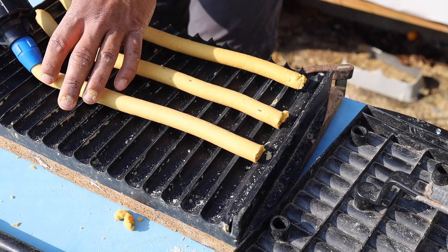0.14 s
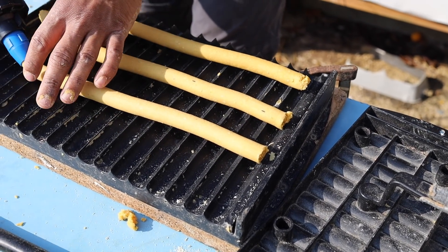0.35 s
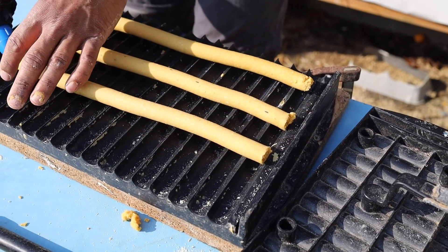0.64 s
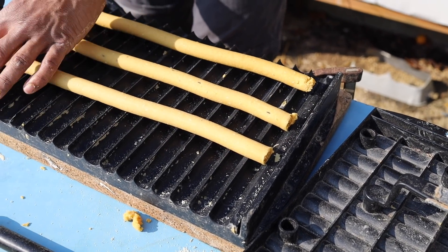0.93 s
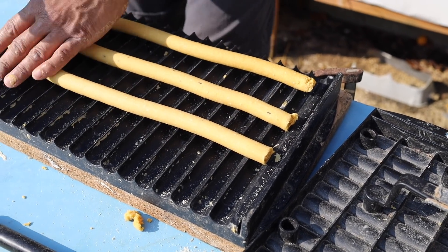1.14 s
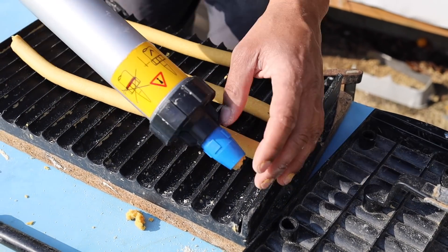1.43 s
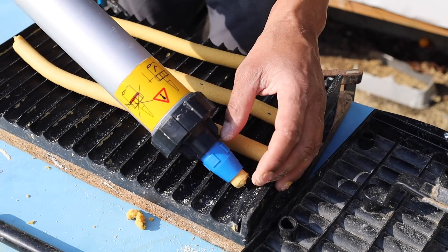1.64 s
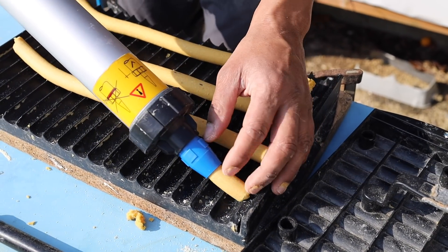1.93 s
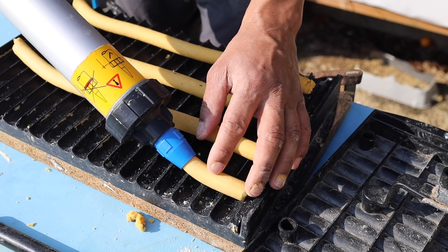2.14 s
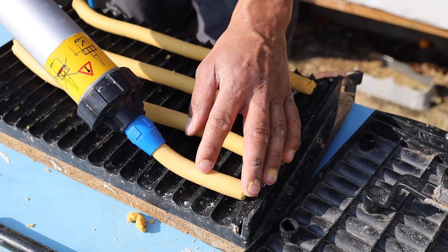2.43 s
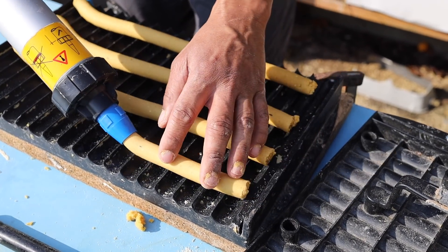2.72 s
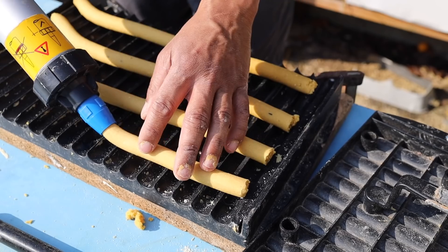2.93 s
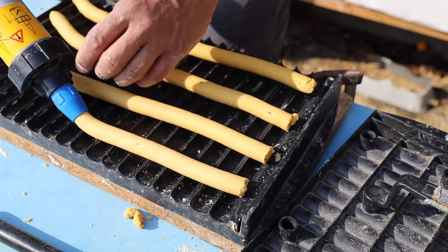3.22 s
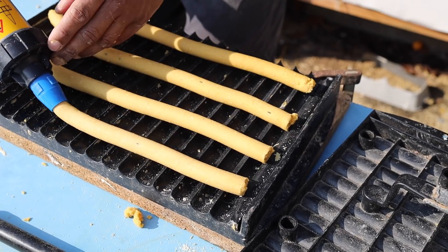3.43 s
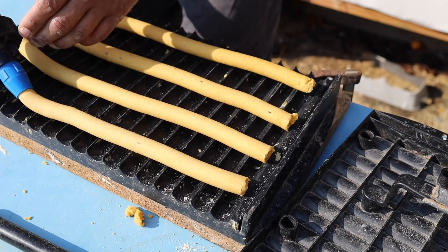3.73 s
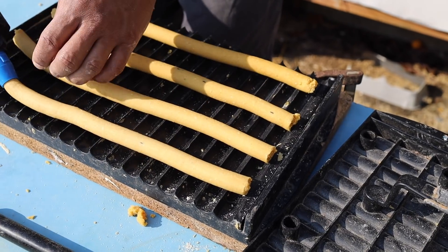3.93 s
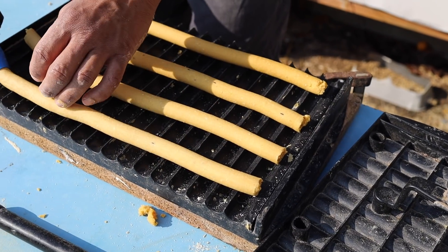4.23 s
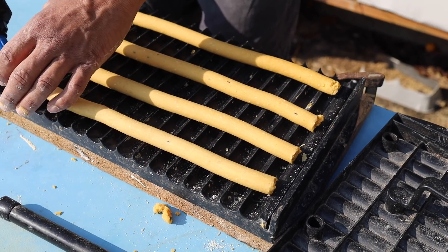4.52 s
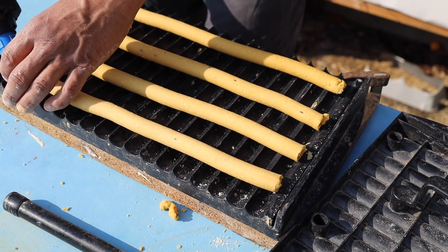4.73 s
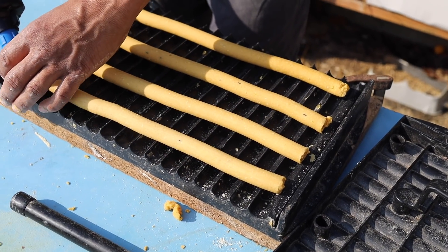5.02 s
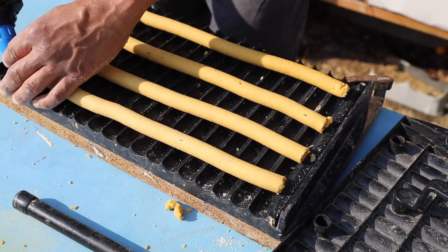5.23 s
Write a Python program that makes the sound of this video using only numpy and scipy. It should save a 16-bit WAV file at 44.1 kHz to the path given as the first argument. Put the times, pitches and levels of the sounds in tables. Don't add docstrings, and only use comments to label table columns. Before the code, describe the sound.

In a quiet open yard, a hand-held air gun dumps pressure in three brief, bright, clipping bursts: one early, two late. Following the first, airy hiss swells and fades as the nozzle bumps the tray. Mid-way, a hard rattling clack and a softer ringing knock stand out. Tiny plastic ticks and creaks fill the gaps. Very close stereo microphone, hardly any echo, low distant background.

```python
import sys
import numpy as np
from scipy import signal
from scipy.fft import rfft, irfft
from scipy.io import wavfile
from scipy.ndimage import uniform_filter1d

SR = 44100
rng = np.random.default_rng(int(sys.argv[2]) if len(sys.argv) > 2 else 0)


def file_out(sig):
    cols = np.atleast_2d(sig).T
    lim = np.clip(cols, -1, 1)
    pcm = np.round(lim * 32767).astype(np.int16)
    wavfile.write(sys.argv[1], SR, pcm)


def field_ratio(decibels):
    return 10 ** (np.asarray(decibels, dtype=float) / 20)


N = 236640


def evened(x):
    return x / np.sqrt(np.mean(x ** 2) + 1e-20)


def read(points, hz):
    f, value = np.transpose(points)
    return np.interp(np.log(hz + 1), np.log(f + 1), value)


def add(mix, start_s, sound):
    part = mix[..., round(start_s * SR):][..., :sound.shape[-1]]
    part += sound[..., :part.shape[-1]]


def resonate(x, hz, width_hz):
    turn = np.exp(2j * np.pi * np.cumsum(hz * np.ones(x.shape[-1])) / SR)
    pole = np.exp(-np.pi * width_hz / SR)
    return 2 * (turn * signal.lfilter([1 - pole], [1, -pole], x / turn)).real


def humps(modes, hz):
    return sum(field_ratio(db) ** 2 / (1 + (2 * (hz - f) / width_hz) ** 2) for f, width_hz, db in modes)


def air(count, colour_db, same, lag, pan_db, patchy_db, flicker_db, held_frames=90):
    frames, hz = count // 64 + 5, np.fft.rfftfreq(256, 1 / SR)[:, None]
    a, b, c, d, patches = rng.standard_normal((frames, 129, 5)).T
    patches = uniform_filter1d(patches, size=2, axis=0)
    patches = evened(uniform_filter1d(patches, size=held_frames, axis=1))
    flicker = evened(uniform_filter1d(rng.standard_normal(frames), size=5))

    gain = field_ratio(colour_db(hz, np.arange(frames) * 64 / SR) + 0 * patches)
    gain = gain / np.sqrt((gain ** 2).mean(0))
    gain = gain * field_ratio(patchy_db * patches + flicker_db * flicker)

    like = np.clip(read(same, hz), 0, 1)
    near = a + 1j * b
    late = np.exp(-2j * np.pi * hz * lag / SR)
    far = like * near * late + np.sqrt(1 - like ** 2) * (c + 1j * d)
    z = np.array([near * field_ratio(pan_db), far]) * gain
    return evened(signal.istft(z, nperseg=256, noverlap=192)[1][:, :count])


def yard():
    # (frequency [Hz], likeness [0-1])
    same = [(60, 0.46), (400, .86), (1300, 0.94), (4000, 0.76), (12000, 0.58)]
    # (frequency [Hz], density [dB per Hz])
    colour = [(25, -27.5), (52, -20), (76, -6), (108, -12.5), (225, -7.5), (340, -7), (440, -5), (771, -9),
              (1480, -9), (2050, -11.5), (2400, -7), (2900, -11), (6100, -10.5), (15700, -19)]
    # (time [s], level [dB])
    levels = [(0, -58.5), (.9, -59), (1.251, -56), (2, -57), (3.8, -58), (4.4, -59), (5.37, -58)]
    white = air(N, lambda hz, s: 0 * hz, same, lag=-3.1, pan_db=-1.2, patchy_db=1.53, flicker_db=0.5)
    coloured = irfft(rfft(white) * field_ratio(read(colour, np.fft.rfftfreq(N, 1 / SR))), N)
    s, level_db = np.transpose(levels)
    return field_ratio(np.interp(np.arange(N) / SR, s, level_db) + 4.0) * evened(coloured)


def note(length_s, start_hz, end_hz, width_hz, db):
    count = int(length_s * SR)
    hz = np.linspace(start_hz, end_hz, count)
    tone = np.sin(2 * np.pi * np.cumsum(hz) / SR)
    fuzz = rng.standard_normal(count) + .12 * tone
    fuzz = resonate(resonate(fuzz, hz, width_hz), hz, width_hz)
    return field_ratio(db) * evened(fuzz) * signal.windows.tukey(count, .6)


def scrapes_and_notes(mix):
    # (time [s], length [s], start [Hz], end [Hz], level [dB])
    scrapes = [
        (.07, .03, 3000, 3050, -64),
        (2.535, .035, 760, 850, -57),
        (2.57, .025, 1020, 1050, -58),
    ]
    # (time [s], length [s], start [Hz], end [Hz], level [dB])
    notes = [
        (.28, .03, 200, 190, -60),
        (.31, .03, 6100, 5900, -64),
        (.53, .06, 6400, 5850, -65),
        (2.165, .06, 370, 360, -59),
        (2.38, .03, 1950, 1950, -65),
        (3.32, .035, 400, 350, -59),
        (4.97, .085, 210, 200, -57),
    ]
    for rows, width_hz in (scrapes, 240), (notes, 50):
        for s, length_s, start_hz, end_hz, db in rows:
            add(mix, s, note(length_s, start_hz, end_hz, width_hz, db))


def blast(crack_s, full_s, full_db, shut_s, closing_s, port_hz):
    # (frequency [Hz], density [dB per Hz])
    jet_colour = [(88, -69.5), (150, -40), (633, -27.5), (697, -30.5), (970, -21), (1320, -25),
                  (2330, -13.5), (3180, -12.5), (3500, -8.5), (5370, -10), (7630, -4.5), (15700, -7.5)]
    # (frequency [Hz], likeness [0-1])
    same = [(300, .05), (1300, .15), (2500, .32), (7000, .3), (15000, .3)]
    # (frequency [Hz], width [Hz], level [dB])
    cavity = [(7900, 440, -16), (15100, 930, -13.5)]
    tilt_db = [7, 4.5, -.5, -5, -2, 2.7, -0.7, 1.3, -2, -4, -4.5]
    lift, crack = .12, .4
    snap_s, hold_s, dump_s, drain_s, die_s = 0.0068, 0.045, 0.027, 0.033, .1
    sealed_db, lift_db, crack_db, creep_db, swell_db, dump_db = -67, -44.5, -29, -22.5, 2.1, -10.5
    sag_db_per_s, shut_db, drain_db, die_db = 106.5, 25, 14, 15

    opening_s = full_s - crack_s
    held_s, closed_s = full_s + hold_s, shut_s + closing_s
    creep_s = max(opening_s - snap_s, crack * opening_s)
    late_s = np.array([held_s, held_s + dump_s, shut_s, closed_s, closed_s + drain_s,
                       closed_s + drain_s + die_s]) - crack_s
    stage_s = np.r_[0, lift * opening_s, crack * opening_s, creep_s, opening_s, late_s]
    falls_db = np.cumsum([sag_db_per_s * (shut_s - held_s - dump_s), shut_db, drain_db, die_db])
    level_db = full_db + np.r_[sealed_db, lift_db, crack_db, creep_db, -swell_db / 2, swell_db / 2,
                               dump_db, dump_db - falls_db]

    def colour_db(hz, s):
        singing = np.clip((s + crack_s - held_s) / dump_s, 0, 1)
        power = field_ratio(read(jet_colour, hz)) ** 2 + humps(cavity, hz)
        power = power + singing * humps([(port_hz, 560, -4.5)], hz)
        return 10 * np.log10(power) + np.interp(s, stage_s, tilt_db) * np.log2((hz + 100) / 6000)

    t = np.arange(SR // 3) / SR
    jet = air(len(t), colour_db, same, lag=1.4, pan_db=0.94, patchy_db=2.0, flicker_db=0.63, held_frames=45)
    return field_ratio(np.interp(t, stage_s, level_db, right=-99)) * jet


def exhaust_blasts(mix):
    # (valve cracks [s], full flow [s], level before overload [dB], valve shuts [s], closing time [s])
    blasts = [
        (0.9676, 0.984, 7, 1.1296, .04),
        (4.431, 4.4737, 9, 4.613, .02),
        (5.214, 5.225, 7, 5.37, .03),
    ]
    port_tones = [7800, 9800, 10200]
    for row, port_hz in zip(blasts, port_tones):
        add(mix, row[0], blast(*row, port_hz))


def tap(peak_db, hz, t60_s):
    t = np.arange(6000) / SR
    pan_db = np.minimum(3 + 2 * np.log2(hz / 600), 4)
    onset = 1 - np.exp(-2.5 * hz * t)
    ring = np.sin(2 * np.pi * hz * t) * onset * field_ratio(-60 * t / np.clip(t60_s, .003, .3))
    return field_ratio(peak_db + .5 * pan_db * np.array([[1], [-1]])) * ring / abs(ring).max()


def taps_and_landing(mix):
    # (time [s], peak [dB], body [Hz], ring t60 [s])
    taps = [(1.249, -46, 544, .058), (1.612, -44, 425, 0.017), (1.615, -40.5, 1150, .0089),
            (1.691, -45, 278, .025), (1.778, -48, 214, .046), (2.066, -44.5, 6000, 0.0037),
            (2.481, -45.5, 522, .0067), (2.483, -47, 895, .014), (3.2112, -43.5, 910, .023),
            (3.2102, -47.5, 501, .011), (3.459, -24.5, 285, 0.012), (3.5038, -40, 730, 0.01),
            (3.528, -40.5, 1420, .0084), (3.5283, -44, 530, .014), (3.757, -48, 311, 0.048),
            (3.757, -45, 690, .011), (4.088, -44, 2100, 0.0074), (4.3586, -35.5, 734, 0.0063),
            (4.3584, -42.5, 1604, .0075), (4.6162, -15.5, 445, .01), (4.616, -22, 690, 0.0076),
            (4.623, -37, 450, 0.016), (4.9, -44.5, 560, 0.016), (4.903, -49, 1000, .014),
            (5.023, -48, 700, .0054)]
    # (frequency [Hz], peak [dB], t60 [s])
    landing = [(172, -39, 0.12), (298, -34, 0.074), (670, -38.5, 0.017), (1620, -29, 0.011),
               (2420, -32.5, .015), (3600, -33, .005)]
    landing_s = 1.6573
    for s, *row in taps:
        add(mix, s, tap(*row))
    for hz, db, t60_s in landing:
        add(mix, landing_s + min(0.55 / hz, .003), tap(db, hz, t60_s))


def leak(start_s, top_s, level_db, fade_db, colour, whistle_db, count):
    # (frequency [Hz], width [Hz], level [dB])
    passages = [(12400, 260, 5), (7300, 500, -13), (4450, 60, -10), (13900, 700, -5)]
    # (frequency [Hz], likeness [0-1])
    same = [(2000, 0.99), (6000, 0.18), (15000, .6)]
    rise_s = 0.049
    t = np.arange(count) / SR
    past_top_s = np.maximum(t + start_s - top_s, 0)
    flow = (1 - np.exp(-t / rise_s)) * field_ratio(level_db - fade_db * past_top_s ** 2)

    def colour_db(hz, s):
        whistle = field_ratio(whistle_db) ** 2 * humps(passages, hz)
        return 10 * np.log10(field_ratio(read(colour, hz)) ** 2 + whistle)

    hiss = air(len(t), colour_db, same, lag=1.4, pan_db=2.5, patchy_db=2.0, flicker_db=0.4)
    return field_ratio(4.5) * flow * hiss


def air_leaks(mix):
    # (trigger [s], strongest [s], level [dB], fade [dB per s squared])
    leaks = [
        (1.365, 1.64, -35.5, 185),
        (4.672, 4.803, -40, 41.5),
    ]
    # (start [s], strongest [s], level [dB], fade [dB per s squared])
    seeps = [
        (1.883, 2.398, -58.5, 150),
        (1.92, 2.799, -61, 3.5),
    ]
    # (frequency [Hz], density [dB per Hz])
    colours = [
        [(880, -45), (1500, -20), (2680, -20), (2900, -25), (3010, -17.5), (3770, -10), (5480, -13),
         (6730, -7.5), (11300, -7), (12400, -2), (13500, -2.5), (14600, -2), (15700, -10.5)],
        [(3000, -24), (7000, -23), (11000, -8), (13200, -3), (14500, 7), (15700, -4)],
        [(880, -48), (1500, -22.5), (2400, -17.5), (3460, -8), (3730, -12), (4460, -3.5), (4800, -14.5),
         (5700, -11), (7080, -1), (8310, -7), (10500, -2), (11400, -12.5), (12300, -1.5), (14200, -8.5)],
    ]
    whistles = [.5, -8, .5]
    # (frequency [Hz], width [Hz], time [s], length [s], level [dB])
    spits = [
        (2850, 900, 1.38, .045, -53),
    ]
    first, seep, second = zip(colours, whistles)
    for row, passage in zip(leaks, (first, second)):
        add(mix, row[0], leak(*row, *passage, count=SR))
    for row in seeps:
        add(mix, row[0], leak(*row, *seep, count=3 * SR))
    for hz, width_hz, s, length_s, db in spits:
        add(mix, s, note(length_s, hz, hz, width_hz, db))


def knock(ring_db, rattle_db, modes, parts):
    # (delay [s], level [dB])
    bounces = [(.0026, -25.5), (.0049, -16.5), (.0074, -17), (0.0097, -36)]
    t = np.arange(1500) / SR
    ring = 0
    for k, (hz, db, t60_s) in enumerate(modes):
        phase = np.pi / 2 if k == 0 else 0
        ring = ring + field_ratio(db - 60 * t / t60_s) * np.sin(2 * np.pi * hz * t + phase)
    ring = ring * field_ratio(-7 * np.clip((t - .002) / 0.00033, 0, 1))

    grit = rng.standard_normal((2, len(t))) * np.exp(-(t / 0.0022) ** 2)
    grit = grit + 1.1 * grit[::-1]
    rattle = sum(field_ratio(db) * resonate(grit, hz, width_hz) for hz, width_hz, db in parts)
    rattle = np.roll(rattle, 12, axis=1) / rattle[:, :90].std()

    both = field_ratio(ring_db) * ring / abs(ring).max() + field_ratio(rattle_db) * rattle
    both = signal.lfilter(*signal.butter(2, 170, "highpass", fs=SR), both)
    both[1] = np.roll(both[1], 1)
    dull = signal.lfilter(*signal.butter(1, 5000, fs=SR), both)
    return both + sum(field_ratio(db) * np.roll(dull, round(s * SR), axis=1) for s, db in bounces)


def hard_knocks(mix):
    # (time [s], barrel ring peak [dB], rattle [dB])
    knocks = [
        (3.45748, -4.5, -13.),
        (3.67768, -9, -29.),
    ]
    # (frequency [Hz], level [dB], t60 [s])
    modes = [
        [(556, 2.5, 0.019), (1500, 6.5, 0.014), (2132, -4.5, 0.039), (950, -5.5, 0.011), (3000, -7, 0.0046),
         (5700, 0, .005)],
        [(567, -9, 0.043), (1365, 0.5, 0.026), (1560, -5.5, 0.013), (2430, 6, 0.008), (2930, -1, 0.0044),
         (4430, -11, 0.0066), (7200, -6, 0.0037)],
    ]
    # (frequency [Hz], width [Hz], level [dB])
    rattles = [
        [(3545, 600, -1), (4737, 830, -2.5), (6035, 1500, -4), (9300, 1400, 1), (11840, 1500, -12.5)],
        [(3330, 1300, -11), (5020, 700, 2.5), (6760, 990, 5), (9200, 330, -16), (12030, 1444, -23)],
    ]
    for (s, *row), ringing, parts in zip(knocks, modes, rattles):
        add(mix, s, knock(*row, ringing, parts))


def walls(x):
    # (frequency [Hz], t60 [s])
    decay = [(200, 0.092), (2000, 0.063), (12000, 0.12)]
    echoes = np.zeros((2, SR // 3))
    at = np.arange(160, SR // 3 - 20, 20) + rng.integers(0, 20, (2, (SR // 3 - 161) // 20))
    np.put_along_axis(echoes, at, rng.choice([-1., 1.], at.shape), 1)
    hz, t, z = signal.stft(echoes, SR, nperseg=128)
    tail = signal.istft(z * field_ratio(-60 * t / read(decay, hz)[:, None]), SR, nperseg=128)[1]
    tail[:, :160] = 0
    return signal.fftconvolve(x, tail / np.linalg.norm(tail[0]), axes=1)[:, :N]


def scene():
    jets, hits = np.zeros((2, 2, N))
    scrapes_and_notes(hits)
    exhaust_blasts(jets)
    taps_and_landing(hits)
    air_leaks(jets)
    hard_knocks(hits)
    no_bass = signal.butter(3, 120, "highpass", fs=SR, output="sos")
    hits = signal.sosfilt(no_bass, hits)
    return jets + field_ratio(-31) * walls(jets) + hits + field_ratio(-22) * walls(hits) + yard()


def roll_off(x):
    return signal.sosfilt(signal.butter(12, 15810, fs=SR, output="sos"), x)


def record(dry):
    excess = np.maximum(abs(dry) - .4, 0) ** 2
    roar = signal.sosfilt(signal.butter(2, 225, "highpass", fs=SR, output="sos"), excess)
    roar = signal.lfilter(*signal.butter(1, 2600, fs=SR), roar)
    hot = np.clip(dry + roar, -.97, .97)
    hot = signal.lfilter(*signal.butter(1, 80, "highpass", fs=SR), hot)
    return roll_off(hot)


dry = scene()
out = record(dry)
file_out(out)
```